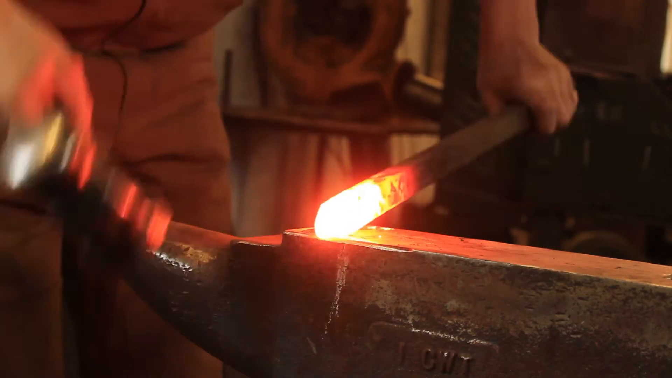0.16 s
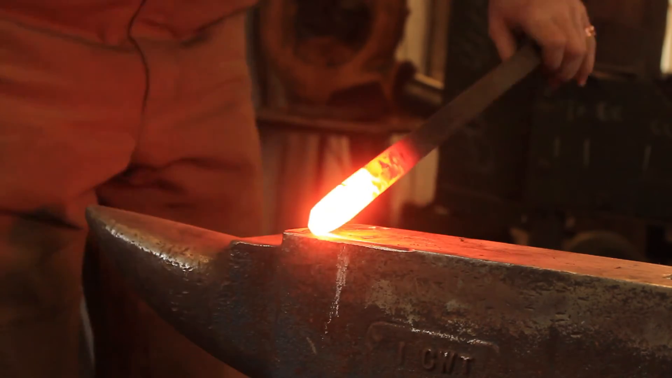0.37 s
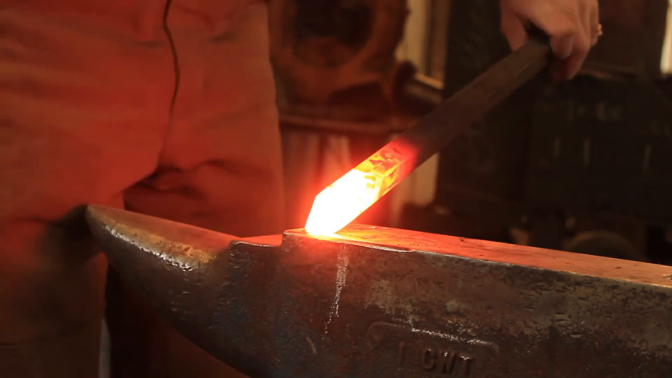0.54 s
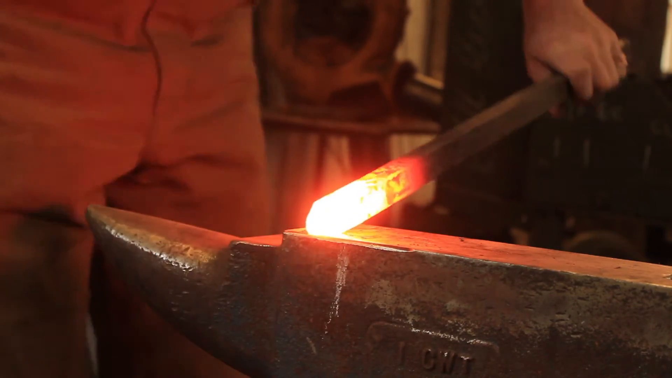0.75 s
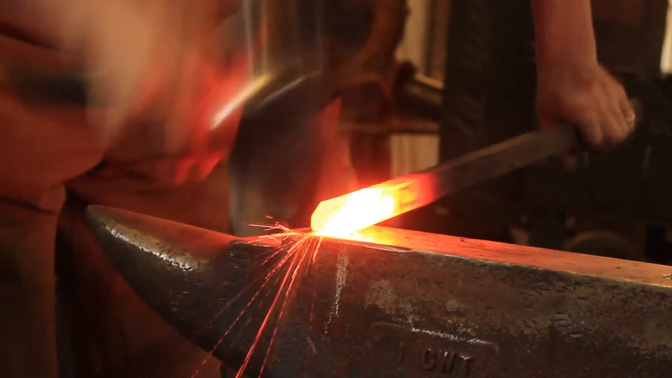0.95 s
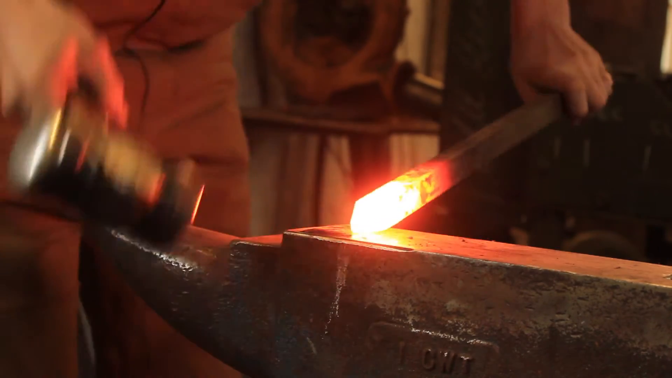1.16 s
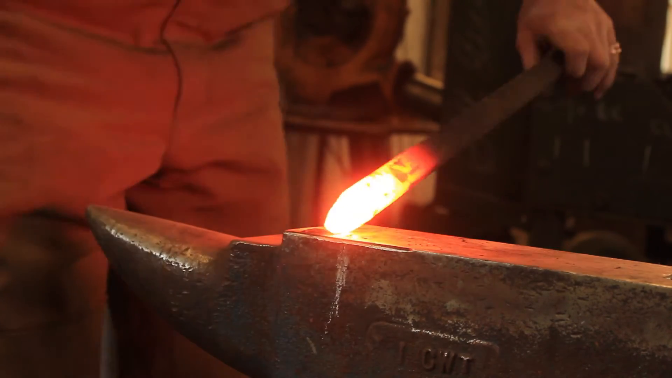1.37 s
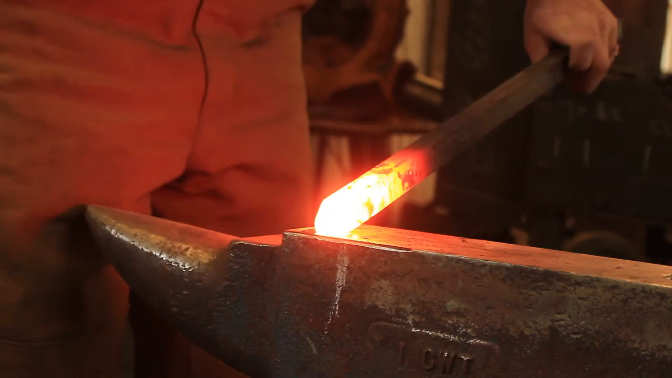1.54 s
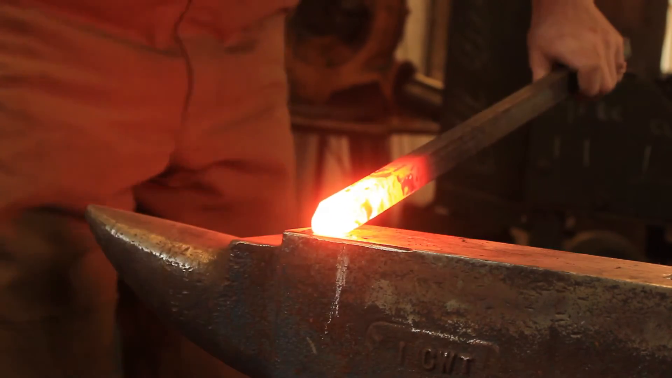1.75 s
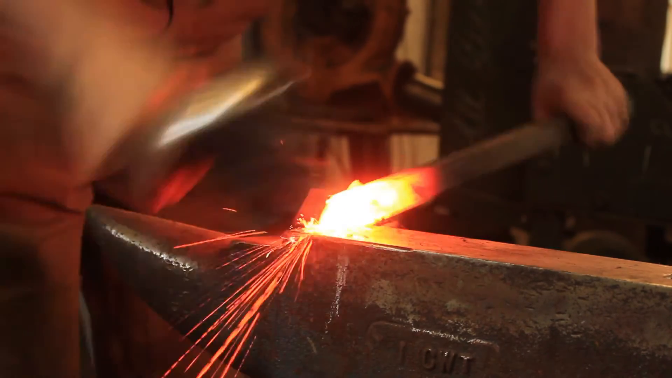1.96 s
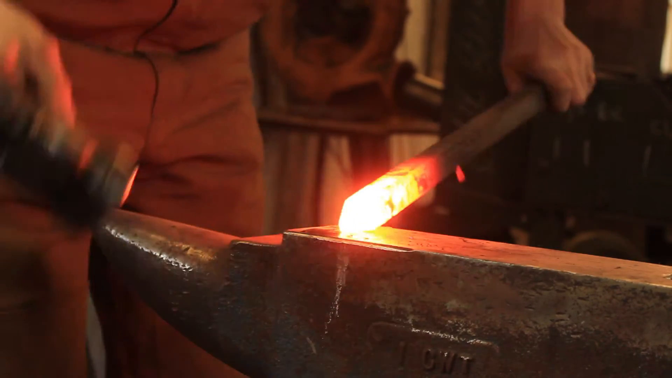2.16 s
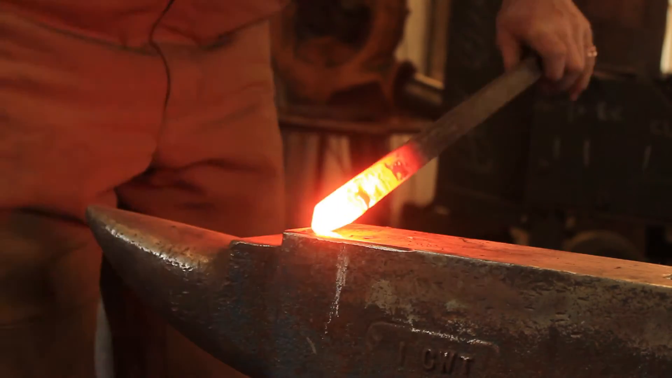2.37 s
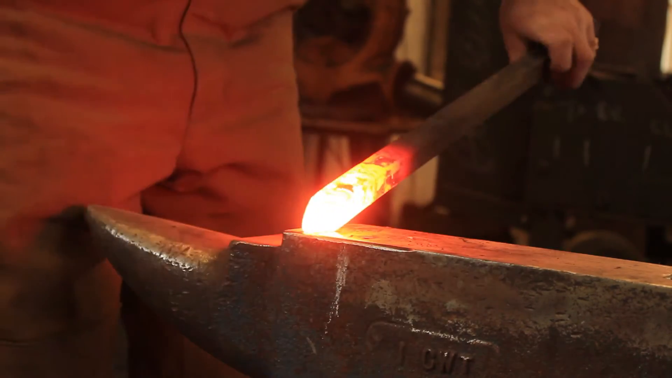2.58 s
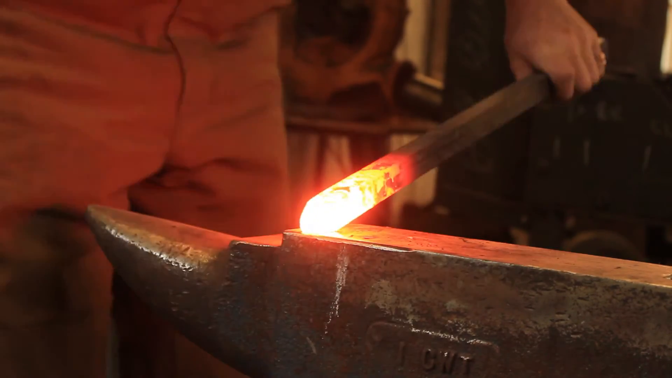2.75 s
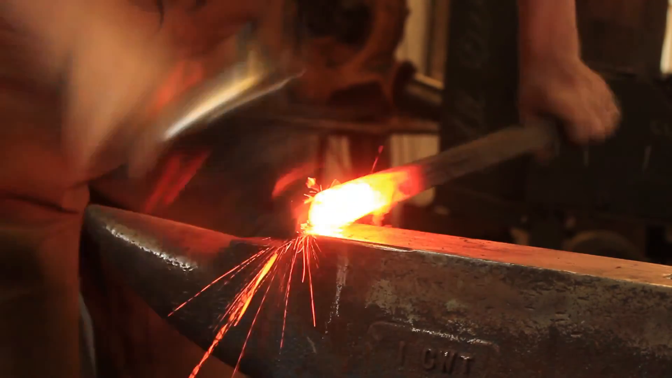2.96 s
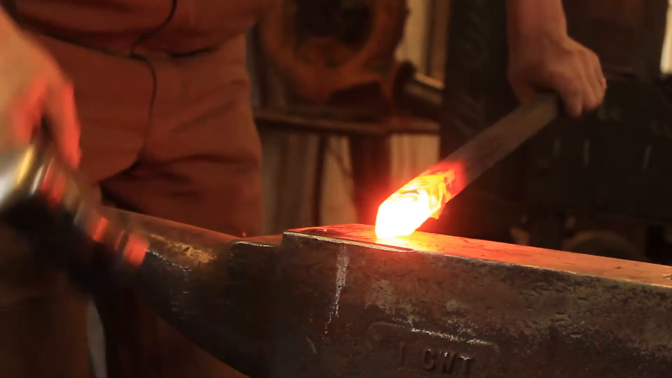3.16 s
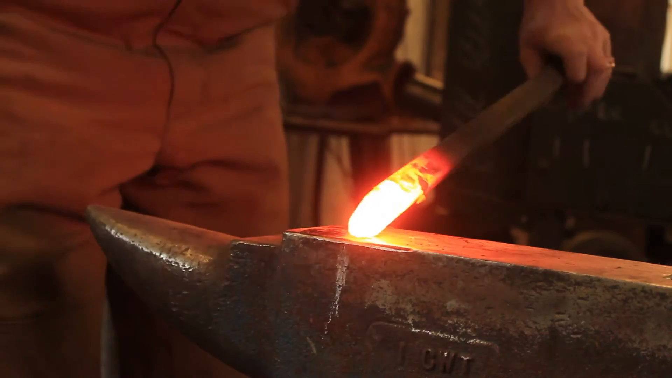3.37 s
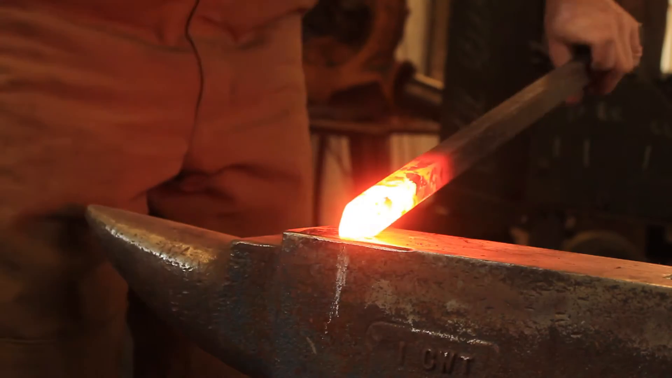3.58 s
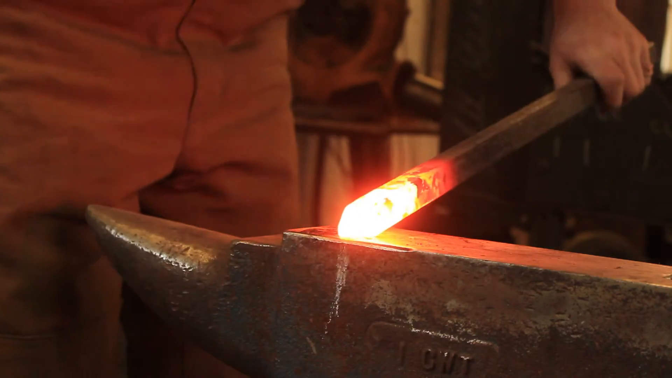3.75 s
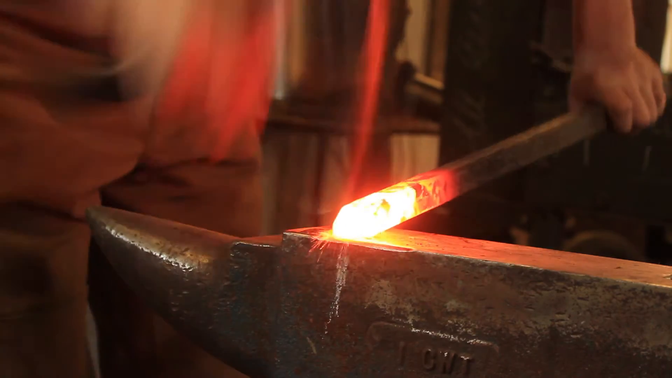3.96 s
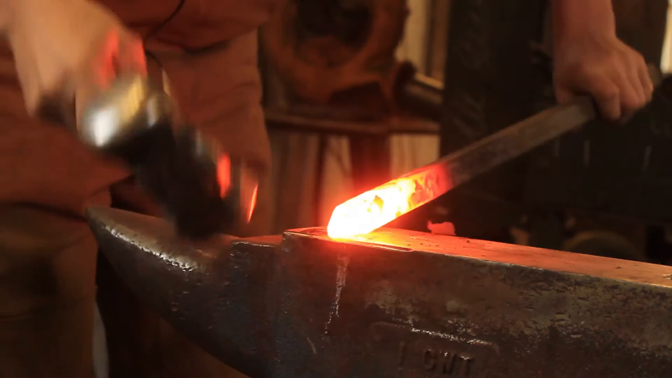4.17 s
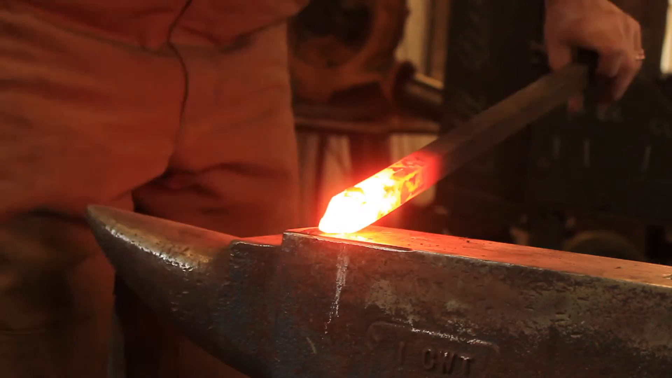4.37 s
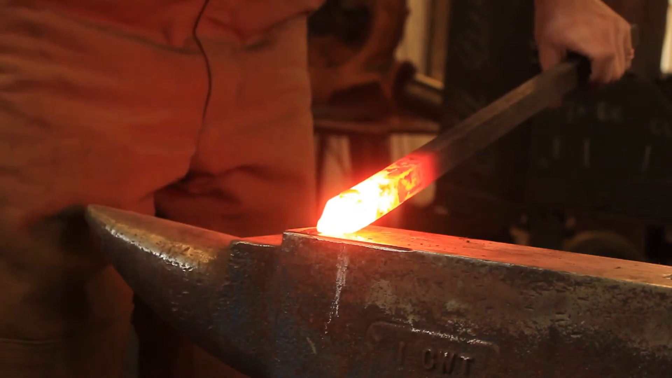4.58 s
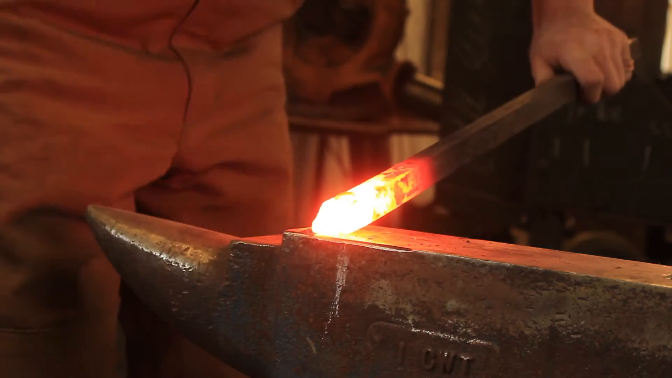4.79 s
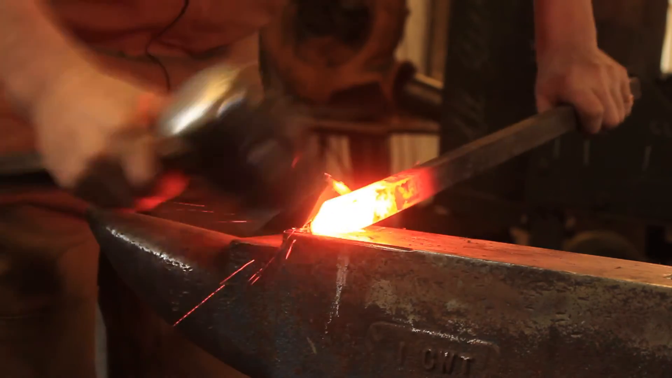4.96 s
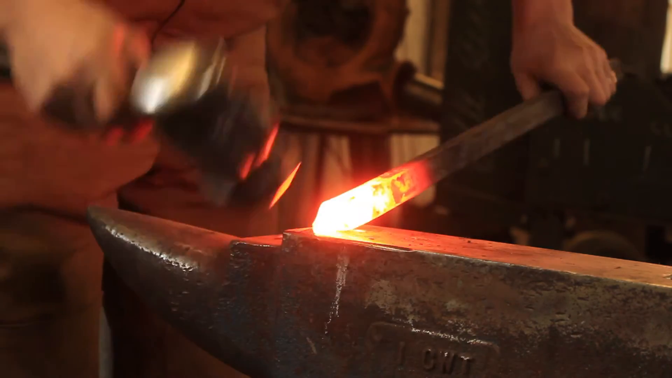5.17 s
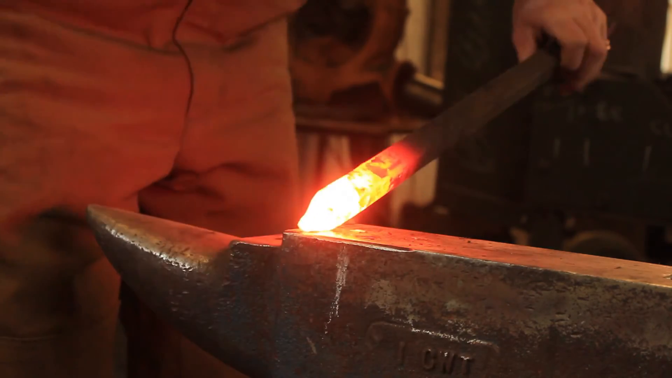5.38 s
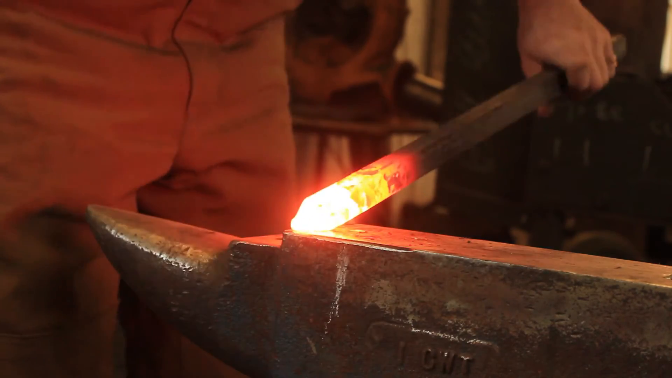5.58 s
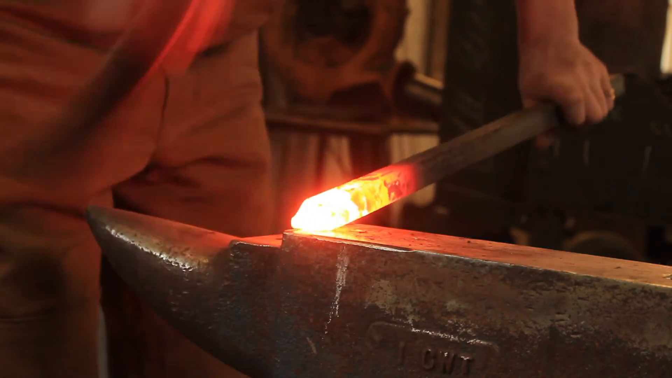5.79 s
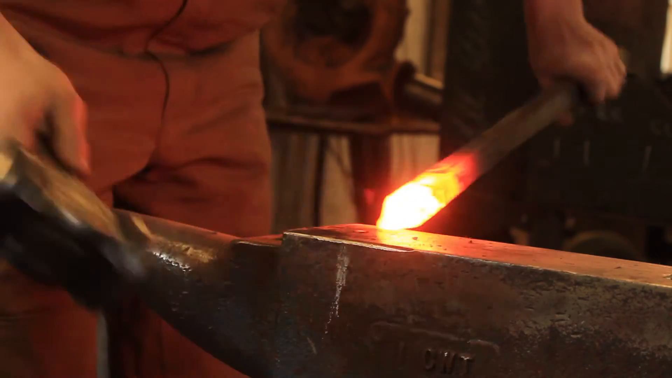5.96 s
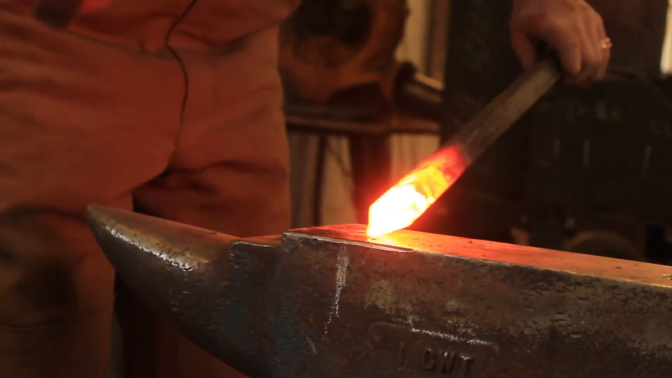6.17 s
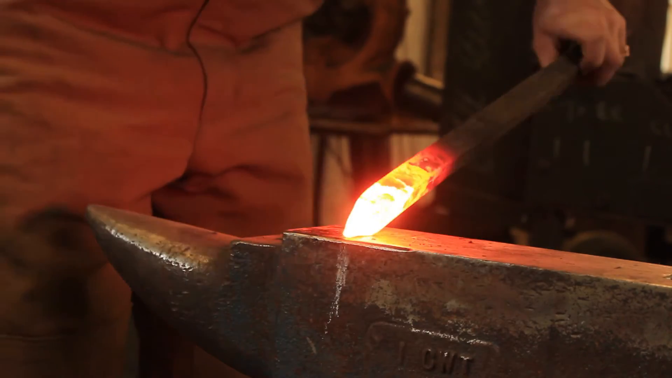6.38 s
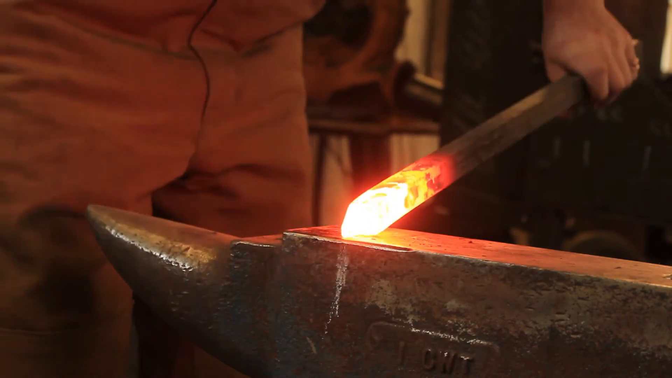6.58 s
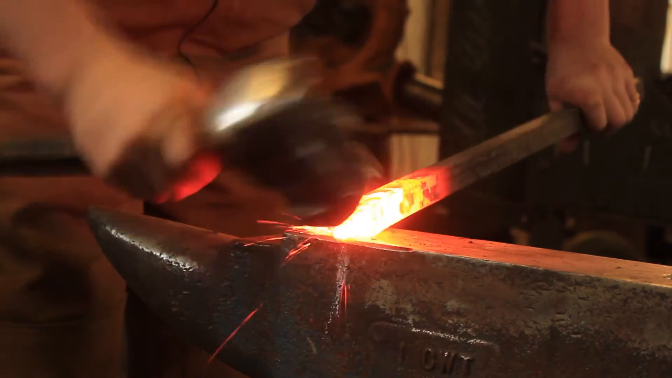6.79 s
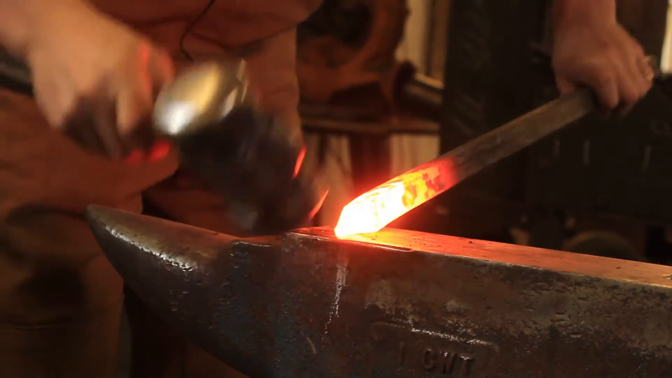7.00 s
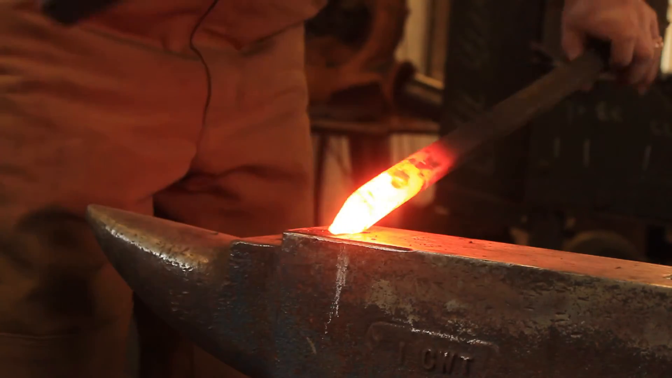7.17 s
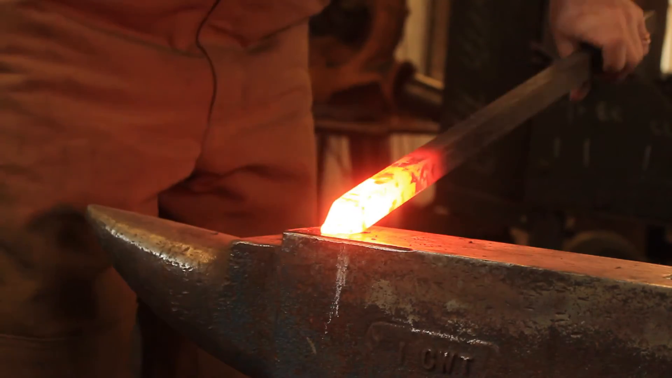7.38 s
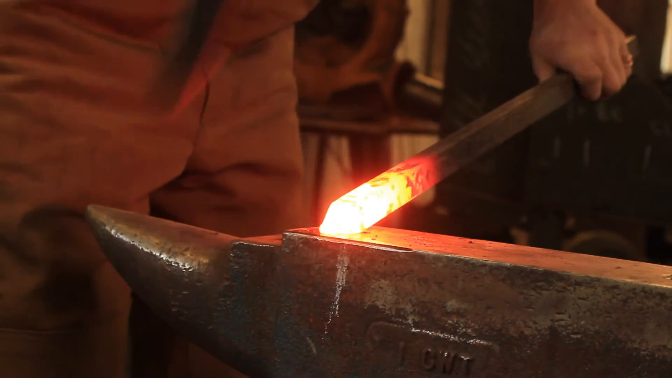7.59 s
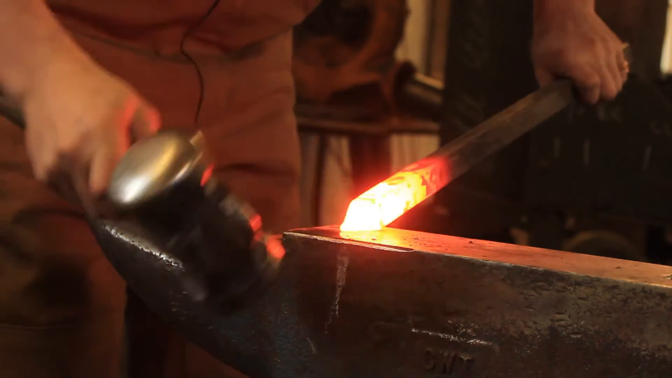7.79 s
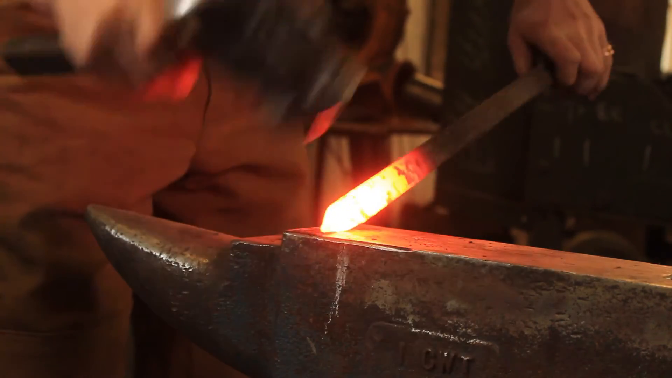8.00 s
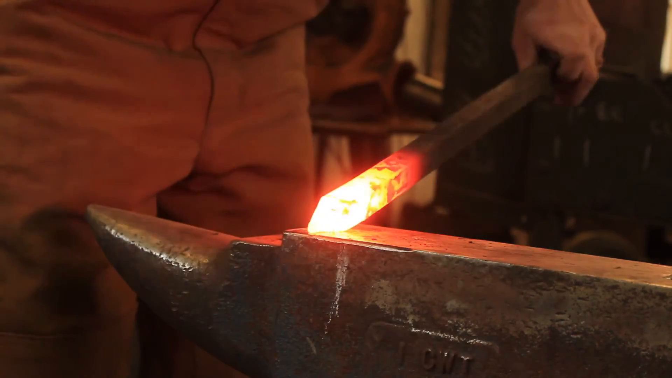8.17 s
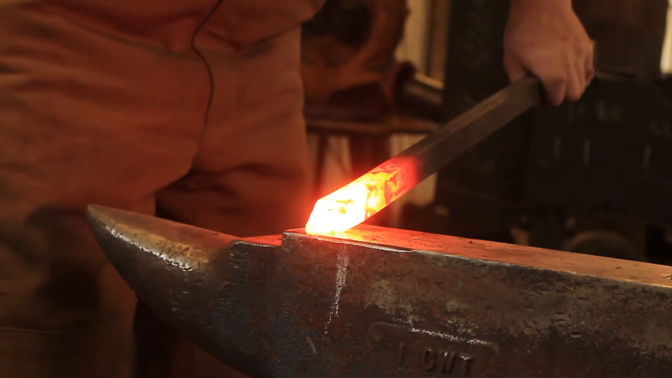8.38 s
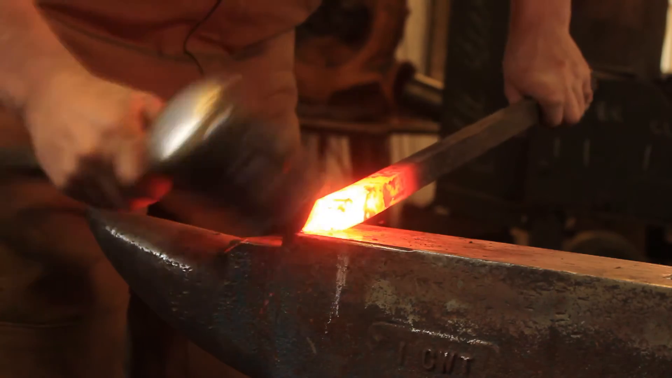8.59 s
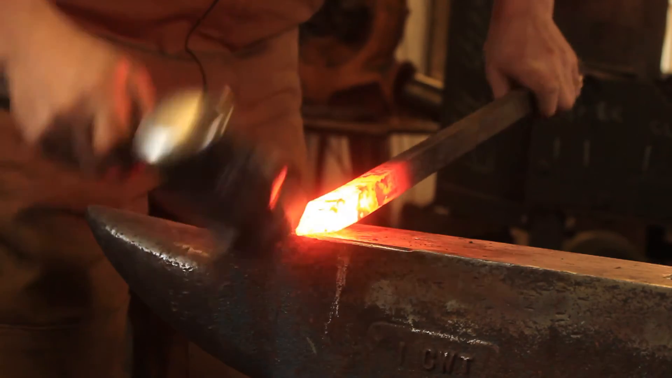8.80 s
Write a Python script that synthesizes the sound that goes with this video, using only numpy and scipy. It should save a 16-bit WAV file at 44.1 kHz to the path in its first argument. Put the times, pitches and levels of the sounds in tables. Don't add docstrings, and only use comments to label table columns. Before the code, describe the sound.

A forge blower runs throughout, a hollow rushing roar with a slightly wavering mid-pitched fan whine. At 0 s a heavy hammer hits hot steel on an anvil: dull crack, short ring, loud iron rattle. The hardest blow, at 1 s, is bright and dead, with little bar ring. At 2 s another hard blow makes the bar ring and bounce back in several clear clinks. Firm blows follow at 3, 4 and 5 s, with ringing, rattling and bar chatter, then a hard one at 5.9 s. Softer, slightly quicker blows land at 6.8, 7.8 and 8.6 s, the first duller, all with strong rattle; the last is softest, with faint bar clinks. Each blow overloads the close microphone; the blower drops, then swells back over a fraction of a second. Short workshop echoes trail the metal.

```python
import sys
import numpy as np
from scipy import signal
from scipy.fft import rfft, irfft
from scipy.io import wavfile
from scipy.ndimage import uniform_filter1d, minimum_filter1d

SR = 44100
rng = np.random.default_rng(int(sys.argv[2]) if len(sys.argv) > 2 else 0)


def magnitude_from_level(level_db):
    exponent = np.asarray(level_db, float) / 20
    return 10 ** exponent


def dump_mix(stems):
    frames = np.atleast_2d(stems).T
    limited = np.clip(frames, -1, 1)
    pcm = np.round(limited * 32767).astype(np.int16)
    wavfile.write(sys.argv[1], SR, pcm)


N = 389844


def evened(x):
    return x / np.sqrt(np.mean(x ** 2) + 1e-20)


def read(points, hz):
    f, value = np.transpose(points)
    return np.interp(np.log(hz + 1), np.log(f + 1), value)


def add(mix, s, sound):
    part = mix[round(s * SR):][:len(sound)]
    part += sound[:len(part)]


def drift(rate_hz, count=N, rows=()):
    hz = np.fft.rfftfreq(count, 1 / SR)
    spectrum = rfft(rng.standard_normal((*rows, count)))
    return evened(irfft(spectrum / (1 + (hz / rate_hz) ** 2), count))


def rings(modes, t, spread_db, rough, rough_hz):
    hz, db, t60 = np.transpose(modes)[:, :, None]
    share, detune, turn = rng.standard_normal((3, len(modes), 1))
    sway, skew = drift(rough_hz, count=len(t), rows=(2, len(modes)))
    angle = 2 * np.pi * hz * (1 + 0.00382 * detune) * t + rough * turn
    tone = (1 + rough * sway) * np.sin(angle) + rough * skew * np.cos(angle)
    fading_db = db + spread_db * share - 60 * t / t60
    return (magnitude_from_level(fading_db) * tone).sum(0)


# f/Hz, level/dB per Hz
ROAR_COLOUR = [(15, -70), (25, -41), (107, -21.5), (141, -25.5), (223, -11.5), (362, -15), (487, -10),
               (543, -16), (621, -3.5), (711, -14.5), (1100, -15), (1830, -19.5), (3690, -22),
               (7450, -30.5), (15900, -47.5)]
# f/Hz,
# width/Hz, level over the roar/dB
DUCT_TONES = [(118.5, 19, 7), (177.6, 9.1, 14.5), (217, 24, 2.5), (409.6, 11, 4), (485, 45, 5),
              (652, 80, -4), (929, 48, 3), (1320, 12.5, 10.5), (1453, 16.4, 12), (1691, 21, 13.5),
              (2172, 52, 7), (2327, 33, 7.5), (2803, 55, 5.5), (3380, 85, 2.5), (3670, 22, 7),
              (4720, 60, 2.5), (7850, 51, 1.5), (14300, 3300, 7)]


def blower():
    roar_level_db, whine_level_db, whine_hz = -17, -20.5, 633.7
    frames, hz = N // 512 + 5, np.fft.rfftfreq(2048, 1 / SR)
    a, b, patches = rng.standard_normal((frames, 1025, 3)).T
    patches = uniform_filter1d(patches, size=24, axis=0)
    patches = evened(uniform_filter1d(patches, size=6, axis=1))
    duct_db = sum(db / (1 + (2 * (hz - f) / w) ** 2) for f, w, db in DUCT_TONES)
    colour_db = (read(ROAR_COLOUR, hz) + duct_db)[:, None]
    z = (a + 1j * b) * magnitude_from_level(colour_db + 0.61 * patches)
    roar = evened(signal.istft(z, nperseg=2048, noverlap=1536)[1][:N])
    flutter_db = 0.2 * drift(15)
    waver_db = 0.45 * drift(2.4)
    turns = np.cumsum(whine_hz + .3 * drift(2.5)) / SR
    whine = np.sqrt(2) * np.sin(2 * np.pi * turns) * magnitude_from_level(whine_level_db + waver_db)
    return magnitude_from_level(roar_level_db + flutter_db) * roar + whine


# f/Hz, level/dB, time to fall 60 dB/s
KNOCK_TONES = [(509.4, -0.5, 0.024), (692, 5, 0.02), (1136, -2, 0.022), (1234, 1.5, 0.012),
               (1730, -11, 0.0072), (2336, -3, 0.01), (2679, -5, 0.017)]
# f/Hz, level/dB
CRACK_COLOUR = [(60, -34), (150, 4), (350, 5), (600, 14), (1500, 5), (4000, 1), (7000, -13), (11000, -20.5),
                (16000, -33)]
# f/Hz, level/dB
RATTLE_COLOUR = [(150, -22), (450, 4.5), (1200, 3), (3000, -5), (4800, -5.5), (6500, -12.5), (9000, -18.5),
                 (16000, -49)]
# f/Hz, level/dB, time to fall 60 dB/s
ANVIL_TONES = [(508, -6, 0.26), (795, -1.5, 0.078), (1030, -5, 0.027), (1156, 0.5, 0.3), (1360, -5, 0.13),
               (1500, -8, 0.23), (1805, 12, 0.07), (2056, -5.5, 0.11), (2090, 3, 0.15), (2395, -9, 0.12),
               (2757, 5, 0.079)]
# f/Hz, level/dB, time to fall 60 dB/s
BAR_TONES = [(2553, -9.5, 0.18), (3190, -8, 0.28), (3370, -13, 0.14), (3634, -28, 0.39), (3530, -9, 0.15),
             (4160, -5, 0.083), (4680, -8.5, 0.2), (5380, -31, 0.17), (5635, -8, 0.08), (6400, -14, 0.15),
             (7420, -22, 0.09), (7800, -17, 0.099), (8700, -23, 0.11), (9600, -47, 0.17)]


def blow(strength_db, bright_db, bar_db, rattle_db):
    t = np.arange(SR // 3) / SR
    hz = np.fft.rfftfreq(len(t), 1 / SR)
    tilt_db = bright_db * np.log2(hz / 1000 + .01)
    colours = [magnitude_from_level(read(CRACK_COLOUR, hz) + tilt_db), magnitude_from_level(read(RATTLE_COLOUR, hz))]
    grit, shake = irfft(rfft(rng.standard_normal((2, len(t)))) * colours, len(t))
    crack = evened(grit) * magnitude_from_level(0.5 - 60 * t / 0.063)
    rattle = evened(shake) * magnitude_from_level(rattle_db - 17.5 - 60 * t / 0.34)
    knock = magnitude_from_level(4.5) * rings(KNOCK_TONES, t, spread_db=1.5, rough=.6, rough_hz=200)
    anvil = magnitude_from_level(-23.5) * rings(ANVIL_TONES, t, spread_db=1, rough=1.39, rough_hz=103)
    bar = magnitude_from_level(bar_db - 18) * rings(BAR_TONES, t, spread_db=1.5, rough=3, rough_hz=220)
    onset = np.minimum(t / .0005, 1)
    return magnitude_from_level(strength_db) * (knock + crack + rattle + anvil + bar) * onset


def bounce(db, hz, t60):
    t = np.arange(SR // 3) / SR
    tones = [(hz - 130, -10, t60), (hz, -1, t60), (hz + 110, -6, t60)]
    ring = rings(tones, t, spread_db=1, rough=.8, rough_hz=70)
    tick = uniform_filter1d(rng.standard_normal(len(t)), size=6) * magnitude_from_level(-17 - 60 * t / 0.024)
    return magnitude_from_level(db) * (ring * np.minimum(t / .0015, 1) + tick)


# f/Hz, time to fall 60 dB/s
SHOP_ECHO = [(150, 0.2), (500, 0.44), (1500, 0.47), (4000, 0.56), (8000, 0.44), (15000, 0.068)]


def shop(x):
    taps = np.zeros(SR)
    at = np.arange(200, SR - 20, 20)
    taps[at + rng.integers(0, 20, len(at))] = rng.choice([-1., 1.], len(at))
    hz, t, z = signal.stft(taps, SR, nperseg=256)
    fading = magnitude_from_level(-60 * t / read(SHOP_ECHO, hz)[:, None])
    tail = signal.istft(z * fading, SR, nperseg=256)[1]
    return signal.fftconvolve(x, tail / np.linalg.norm(tail))[:N]


# t/s, strength/dB, brightness/dB per octave, bar ring/dB, rattle/dB
HAMMER_BLOWS = [
    (.0050, 10.5, 1, -13, 6.5),
    (1.0316, 15.5, 3.5, -30, -21),
    (2.0219, 12, 1.7, 0, -2),
    (3.0247, 7, 1, 3.5, 6.5),
    (4.0431, 9.5, 2, 0, -1),
    (5.001, 7.5, 2, 2.5, -7),
    (5.9019, 12, 2, -6.5, -4),
    (6.8475, 3.5, -2.5, 4, 8.5),
    (7.7554, 2, 0.5, 4.5, 10.5),
    (8.6254, 0, -1, 2, 10),
]
# t/s,
# level/dB, f/Hz, time to fall 60 dB/s
LATE_RINGS = [(0.045, -16, 3270, 0.23), (1.034, -29, 13800, .15), (2.037, -12, 4550, 0.41),
              (2.04, -14, 6400, 0.33), (2.056, -7.5, 3134, 0.36), (2.045, -22, 7200, .25),
              (2.04, -26, 9300, .3), (2.03, -28, 13900, .22), (2.095, -11, 2880, 0.14),
              (2.125, -9.5, 3190, 0.15), (3.044, -7, 3410, 0.15), (3.124, -19, 3400, 0.17),
              (4.1, -14, 2940, .2), (5.058, -9, 2920, 0.16), (5.915, -9, 4780, 0.32),
              (6.852, -6, 3540, 0.16), (8.685, -22, 4750, 0.35), (8.688, -16, 3400, 0.31)]


def scene():
    steel, drops = np.zeros((2, N))
    for s, *stroke in HAMMER_BLOWS:
        add(steel, s, blow(*stroke))
    for s, *drop in LATE_RINGS:
        add(drops, s, bounce(*drop))
    wet = magnitude_from_level(-11.0) * shop(steel + drops)
    return np.tile(steel + drops + wet + blower(), (2, 1))


def filled(x):
    share, level_db, wide_hz = .08, -2, 1900
    window, side = signal.windows.kaiser_bessel_derived(2048, 4 * np.pi), np.zeros(N)
    hz = np.fft.rfftfreq(2048, 1 / SR)
    for start in range(371 + 2048, N - 2048, 1024):
        part = x[start - 1500:][:2048]
        chance, place, wide = rng.random(3)
        if chance < share and abs(x[start - 1500:start + 2048]).max() < .8:
            low_hz = 4200 + 10000 * place ** 1.6
            band = (hz > low_hz) & (hz < low_hz + wide_hz * (.6 + wide))
            add(side, start / SR, magnitude_from_level(level_db) * window * irfft(rfft(part) * band))
    return side * [[1], [-1]]


def band_limit(x):
    return signal.sosfilt(signal.butter(12, 16010, fs=SR, output="sos"), x)


def record(dry):
    power = signal.lfilter([.004], [1, -.996], dry[0] ** 2)
    over_db = 0.61 * np.maximum(10 * np.log10(power + 1e-12) + 11, 0)
    hold = round(.11 * SR)
    over_db = -minimum_filter1d(-over_db, size=hold, origin=(hold - 1) // 2, mode="constant")
    climb = np.arange(N) * 33.0 / SR
    duck_db = np.maximum.accumulate(over_db + climb) - climb
    quick, slow = np.exp(-1 / (0.0054 * SR)), np.exp(-1 / (0.032 * SR))
    quick_db = 0.89 * signal.lfilter([1 - quick], [1, -quick], duck_db)
    slow_db = 0.24 * signal.lfilter([1 - slow], [1, -slow], duck_db)
    duck_db = quick_db + slow_db
    hiss = magnitude_from_level(-54.5) * np.diff(rng.standard_normal(N + 1))
    clipped = 0.97 * np.clip(dry * magnitude_from_level(-duck_db), -1, 1) + hiss
    amplifier = signal.butter(1, [95, 13000], "band", fs=SR, output="sos")
    rounded = signal.sosfilt(amplifier, clipped)
    edge = signal.firwin(301, 15950, window=("kaiser", 8), fs=SR)
    rounded = signal.oaconvolve(rounded[0], edge, "same")
    return band_limit(rounded + filled(rounded))


dry = scene()
out = record(dry)
dump_mix(out)
```